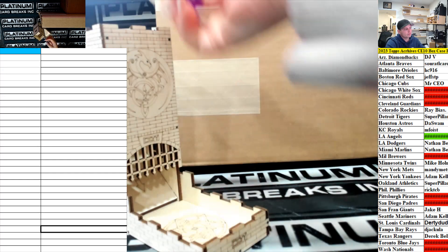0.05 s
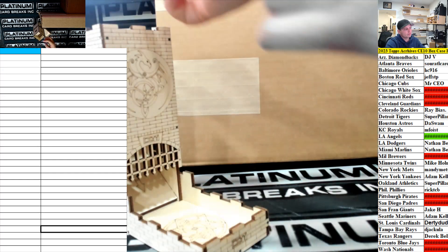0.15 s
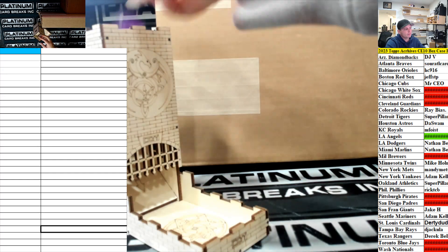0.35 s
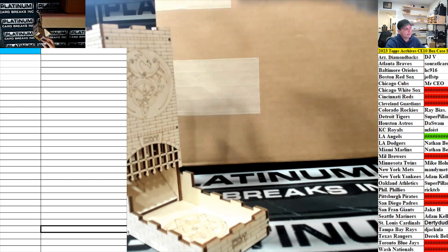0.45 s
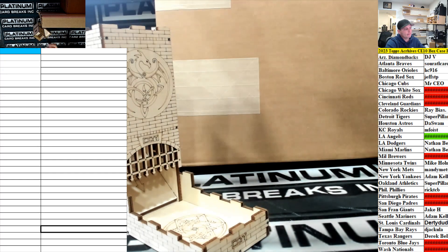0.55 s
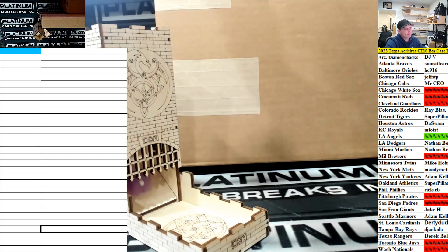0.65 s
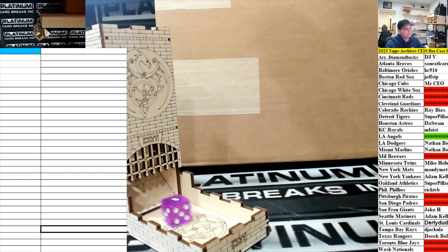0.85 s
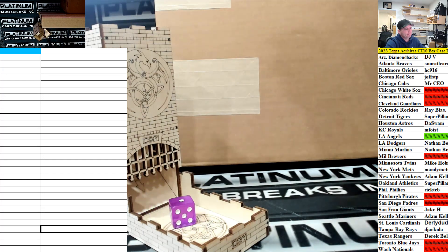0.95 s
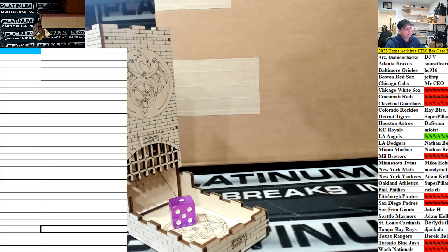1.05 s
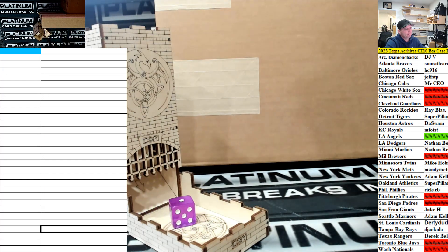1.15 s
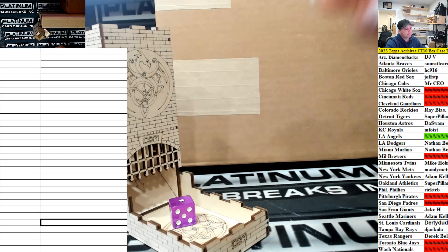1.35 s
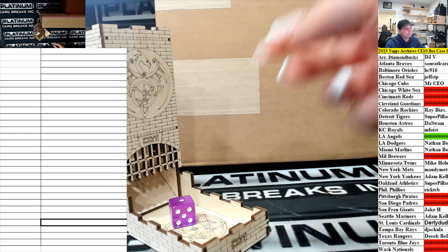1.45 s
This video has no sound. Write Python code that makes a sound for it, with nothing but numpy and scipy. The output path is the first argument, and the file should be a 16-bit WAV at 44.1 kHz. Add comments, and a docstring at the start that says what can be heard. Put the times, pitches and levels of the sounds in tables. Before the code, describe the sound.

Hard die cracks and rattles through a hollow thin-wood tower, knocking to rest in a small room

```python
"""A plastic die is dropped into a plywood dice tower on a desk in a small room with a faint steady air tone.
It cracks onto the top baffle, knocks down a ramp and the exit chute, lands in the tray and tips to rest on its floor.
Each contact is a burst of noise and dying cosines: the panel struck, the tower's hollow note and the desk's thump.
The room answers with early echoes and a short diffuse tail.
Near the end comes a faint swish of shaped noise that swells and leaves a thin hiss."""
import sys
import numpy as np
from scipy import signal
from scipy.fft import rfft, irfft
from scipy.io import wavfile

SR = 44100
rng = np.random.default_rng(int(sys.argv[2]) if len(sys.argv) > 2 else 0)


def transcribe(signal):
    """Save signal, clipped to [-1, 1], as a 16-bit WAV file at the path in sys.argv[1]."""
    frames = np.atleast_2d(signal).T
    limited = np.clip(frames, -1, 1)
    pcm = np.round(limited * 32767).astype(np.int16)
    wavfile.write(sys.argv[1], SR, pcm)


N = 66150  # samples in the scene: 1.5 s

# Contacts of the die, with the strength of the blow at four pitches:
# (time [s], panel struck, thump [dB], knock [dB], clack [dB], tick [dB])
CONTACTS = [ (0.2248, "baffle", 10, -5.5, 4.5, 15), (0.2293, "baffle", 12, 2, 14.5, 5.5),
            (0.2340, "baffle", 13, -2.5, 0, 3.5), (0.2465, "baffle", -2.5, -6.5, -4.5, -1.5),
            (0.2515, "baffle", 6.5, 2, -3, -5), (0.2645, "ramp", 0, 5, 5, -6),
            (0.2705, "ramp", -12.5, 2, 0.5, -17), (0.2882, "ramp", -3.5, 2.5, 5, -4),
            (0.3166, "ramp", 3, 4.5, 10, -5.5), (0.321, "ramp", 7, 3.5, 3, -3),
            (0.3603, "ramp", 2.5, -5, 11.5, -1), (0.3662, "ramp", -4.5, 3.5, 9, -7),
            (0.3810, "ramp", -4.5, -1, 0, -9.5), (0.3995, "ramp", -10.5, -9, -6, -12.5),
            (0.4065, "ramp", -15.5, 0, -0.5, -14.5), (0.4202, "chute", -8.5, 5.5, 6, -16),
            (0.4257, "chute", -5, 3.5, 0.5, -13), (0.4348, "chute", -9, 7, 5.5, -8.5),
            (0.4440, "chute", 8.5, 1, 4, -1.5), (0.4530, "tray", 6, 1.5, -6, -3.5),
            (0.5060, "tray", 0, -1, -4.5, -7.5), (0.5094, "tray", 6.5, 6, 5, 5),
            (0.5125, "tray", 1.5, 9.5, 9, 3), (0.5182, "tray", 7, 3, -0.5, -4.5),
            (0.5385, "tray", 0, 2, -9.5, -6.5), (0.5560, "tray", -8, -6.5, -15.5, -18.5),
            (0.5805, "tray", -9, -26, -30, -27), (0.6107, "floor", -5.5, 3, 1.5, -12),
            (0.6174, "floor", -11.5, 5, 1, -40), (0.6311, "floor", -11.5, 3.5, 8, -14.5),
            (0.6380, "floor", -4, -2, 1, -14.5), (0.723, "floor", -19.5, -17.5, -30.5, -48.5)]
THUMP_HZ, KNOCK_HZ, CLACK_HZ, TICK_HZ = 200, 1400, 3500, 9000

# Clear modes of each panel: (frequency [Hz], height over the dense modes [dB], t60 [s])
PANEL_MODES = { "baffle": [(1266, 0, .07), (2530, 12, .009), (2700, 11, .011), (4158, 0, .06),
               (4235, 0, .06), (4500, 8, .0056), (8570, 15, .07), (10100, 10, .009)],
               "ramp": [(760, 2, .03), (1240, 4, .06), (1630, 1, .02), (2560, 2, .02), (3138, 2, .02),
               (4272, 2, .025)], "chute": [(824, 3, .035), (1238, 11, .12), (1290, 3, .06), (1630, 5, .02),
               (1720, 4, .025), (2220, 1, .025), (2520, 2, .02)], "tray": [(715, 6, .045), (760, 14, .03),
               (828, 8, .04), (1028, 4, .07), (1190, 8, .06), (1287, 7, .07), (1416, 0, .025),
               (2126, 0, .025), (2444, 0, .02)], "floor": [(780, 5, .02), (1437, 0, .022), (2300, 0, .012)]}
# The tower's hollow note, rung by every contact: (frequency [Hz], height over the dense modes [dB], t60 [s])
HOLLOW_MODES = [(220, 12, .21)]
# Modes of the desk, rung by every contact: (frequency [Hz], height over the dense modes [dB], t60 [s])
DESK_MODES = [(48, 2, 0.9), (83.7, 10, 0.4), (120, 1, 0.031), (167.5, 2.5, .06), (249, 2, .025)]
# Ring of each panel's dense modes: panel to t60 [s]
CRACK_T60 = {"baffle": 0.033, "ramp": .04, "chute": .036, "tray": .05, "floor": 0.02}
# Colour of the plywood, laid over every blow: (frequency [Hz], level [dB])
PLYWOOD_COLOUR = [(30, -17), (70, 4.5), (130, 7), (230, -3), (320, -4.5), (430, -3.5), (560, -2.5),
                  (760, -1), (980, -1.5), (1350, 4.5), (2400, 0.5), (3500, -3.5), (5500, -2.5), (7500, 1.5),
                  (10500, -5.5), (13000, -11), (16000, -18)]
PLYWOOD_ATTACK_S = 0.00058  # time constant of a blow spreading through the panel
PLYWOOD_LOWEST_HZ = 400  # where the dense modes begin
MODE_SPREAD_DB, MODE_DETUNE = 1.5, .006  # typical random change of a mode's level, and of its pitch as a share

# Colour of the swish: (frequency [Hz], relative level per Hz [dB])
SWISH_COLOUR = [(100, -28.5), (550, 6), (1200, -4), (2300, 3), (4600, -4.5), (7000, -9), (9000, -4.5),
                (10500, -13.5), (13000, -13.5), (14600, -7), (16000, -12.5)]
# Bands of the swish that stand out or hiss on:
# (centre [Hz], width [Hz], level at the peak [dB], rise time constant [s], t60 [s])
SWISH_BANDS = [(2420, 800, -66, 0.019, 0.079), (4720, 260, -71, .008, 0.14), (8850, 700, -77, 0.016, 1),
               (14300, 600, -86, 0.014, .8)]
SWISH_PEAK_S, SWISH_DB = 1.372, -59  # moment of the peak, and level of the main noise there
SWISH_RISE_S, SWISH_T60_S = .015, 0.21  # rise time constant and fall of the main noise
SWISH_ROOM_DB = 1  # extra level of the swish on its way into the room

# Echoes off nearby surfaces: (delay [s], level [dB])
ECHOES = [(.0024, -14), (.0049, -19.5), (.0075, -14.5), (.0098, -14)]
# Colour of the diffuse tail: (frequency [Hz], level [dB])
TAIL_COLOUR = [(80, -1), (250, -4), (600, -5.5), (1150, -1.5), (1550, -3), (2100, -1.5), (2550, -5.5),
               (3200, -3), (6000, -1.5), (9000, -7), (15000, -0.5)]
# Decay of the diffuse tail: (frequency [Hz], t60 [s])
TAIL_T60 = [(80, .55), (250, .42), (600, .35), (1500, .295), (3000, .305), (6000, .28), (9000, .245),
            (15000, .205)]
TAIL_DB, TAIL_DELAY_S, TAIL_BUILD_S = -1.48, .011, 0.0035  # gain, start and build-up time constant

# Colour of the room tone: (frequency [Hz], relative level per Hz [dB])
AIR_COLOUR = [(20, -8), (45, 0), (85, -3), (130, -12), (230, -12), (400, -14), (700, -20), (1400, -25.5),
              (2800, -28.3), (6000, -30.3), (16000, -32.7)]
AIR_DB = -69.0  # RMS level of the room tone

CUTOFF_HZ = 16000  # top of the sound's range


def die():
    """Each contact rings its panel, the hollow tower and the desk, brighter or duller with its strengths."""
    clatter = np.zeros(N)
    for time_s, panel, *strengths_db in CONTACTS:
        blow_colour = list(zip((THUMP_HZ, KNOCK_HZ, CLACK_HZ, TICK_HZ), strengths_db))
        modes = PANEL_MODES[panel] + HOLLOW_MODES + DESK_MODES
        ring = panel_ring(modes, CRACK_T60[panel])
        clatter += delayed(colour(ring, blow_colour, PLYWOOD_COLOUR), time_s)
    return clatter


def panel_ring(modes, crack_t60):
    """One blow: a short noise crack for the dense modes, and dying cosines for the clear ones."""
    t = np.arange(SR // 3) / SR
    attack = 1 - np.exp(-t / PLYWOOD_ATTACK_S)
    crack = rng.standard_normal(len(t)) * dying(t, crack_t60) * attack
    crack /= np.linalg.norm(crack)  # unit energy
    highpass = signal.butter(2, PLYWOOD_LOWEST_HZ, "high", fs=SR, output="sos")
    ring = signal.sosfilt(highpass, crack)
    for hz, db, t60 in modes:
        fall = dying(t, t60) * attack
        level_draw, pitch_draw = rng.standard_normal(2)
        gain = from_db(db + MODE_SPREAD_DB * level_draw)
        mode_hz = hz * (1 + MODE_DETUNE * pitch_draw)
        # dividing by the sum sets the height of the mode's spectral peak, however long it rings
        ring += gain * 2 / fall.sum() * fall * np.cos(2 * np.pi * mode_hz * t)
    return ring


def swish():
    """Something light, perhaps a sleeve, brushes the desk once: friction noise swells and leaves a thin hiss."""
    t = np.arange(N) / SR - SWISH_PEAK_S
    main_noise = colour(rng.standard_normal(N), SWISH_COLOUR)
    brush = swell(main_noise, t, SWISH_DB, SWISH_RISE_S, SWISH_T60_S)
    for hz, width_hz, db, rise_s, t60 in SWISH_BANDS:
        edges_hz = [hz - width_hz / 2, hz + width_hz / 2]
        bandpass = signal.butter(2, edges_hz, "band", fs=SR, output="sos")
        band_noise = signal.sosfilt(bandpass, rng.standard_normal(N))
        brush += swell(band_noise, t, db, rise_s, t60)
    return brush


def swell(noise, t, db, rise_s, t60):
    """Noise that grows exponentially up to t = 0, then dies away exponentially."""
    rise = np.exp(np.minimum(t, 0) / rise_s)
    fall = dying(np.maximum(t, 0), t60)
    return from_db(db) * rise * fall * noise / noise.std()


def room(x):
    """Reflections: early echoes, then a diffuse noise tail whose decay time varies with pitch."""
    t = np.arange(N) / SR
    hz = np.arange(N // 2 + 1) * SR / N
    tail_spectrum = rfft(rng.standard_normal(N)) * from_db(at_hz(TAIL_COLOUR, hz))
    tail = np.zeros(N)
    for centre_hz, t60 in TAIL_T60:
        # overlapping bands: each is full at its own centre and silent at its neighbours'
        share = at_hz([(f, f == centre_hz) for f, _ in TAIL_T60], hz)
        fall = dying(t, t60) * (1 - np.exp(-t / TAIL_BUILD_S))
        tail += irfft(tail_spectrum * share, N) * fall / np.linalg.norm(fall)
    early = sum(from_db(db) * delayed(x, delay_s) for delay_s, db in ECHOES)
    diffuse = signal.fftconvolve(x, tail)[:N]
    return early + from_db(TAIL_DB) * delayed(diffuse, TAIL_DELAY_S)


def room_tone():
    """A faint steady rumble and hiss: coloured noise."""
    air = colour(rng.standard_normal(2 * N), AIR_COLOUR)[N:]  # the filter has settled by the second half
    return from_db(AIR_DB) * air / air.std()


def from_db(db):
    """Decibels to gain."""
    return 10 ** (np.asarray(db) / 20)


def at_hz(points, hz):
    """Read a table of (frequency [Hz], value) on a log-frequency axis."""
    points = np.array(points)
    return np.interp(np.log(hz + 1e-9), np.log(points[:, 0]), points[:, 1])


def dying(t, t60):
    """Exponential decay: a fall of 60 dB in t60 seconds."""
    return np.exp(-np.log(1000) * t / t60)


def colour(x, *spectra):
    """Causal (minimum-phase) filter with the sum of the given spectra in dB."""
    size = 2 ** int(np.ceil(np.log2(len(x) + 1024)))
    hz = np.arange(size // 2 + 1) * SR / size
    gain = from_db(sum(at_hz(spectrum, hz) for spectrum in spectra))
    # folding the cepstrum onto positive time gives the minimum phase
    cepstrum = irfft(np.log(gain))
    cepstrum[1:size // 2] *= 2
    cepstrum[size // 2 + 1:] = 0
    response = np.exp(rfft(cepstrum))
    return irfft(rfft(x, size) * response)[:len(x)]


def delayed(x, start_s):
    """The sound moved later by start_s seconds and cut to the scene's length."""
    return np.pad(x, (int(max(start_s, 0) * SR), N))[:N]


def scene():
    """The die in its tower and the swish after it, heard directly and by way of the room, over the room tone."""
    clatter = die()
    brush = swish()
    reflections = room(clatter + from_db(SWISH_ROOM_DB) * brush)
    mix = clatter + brush + reflections + room_tone()
    return mix[None]  # one channel


def record(dry):
    """A steep elliptic low-pass cuts off the top."""
    lowpass = signal.ellip(10, .2, 70, CUTOFF_HZ, fs=SR, output="sos")  # order, ripple dB, rejection dB
    return signal.sosfilt(lowpass, dry)


dry = scene()
out = record(dry)
transcribe(out)
```